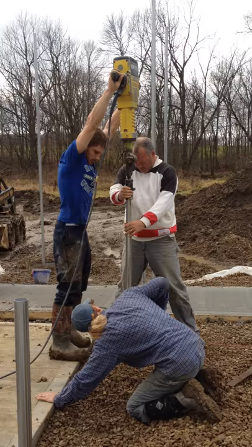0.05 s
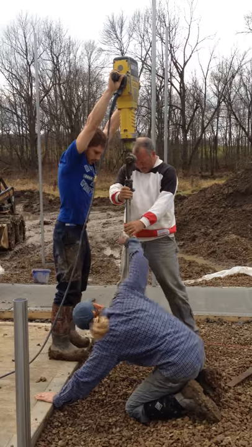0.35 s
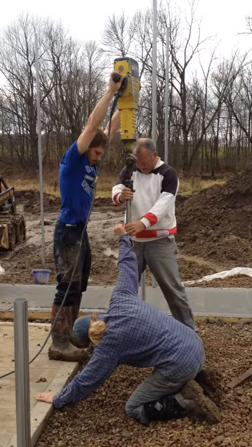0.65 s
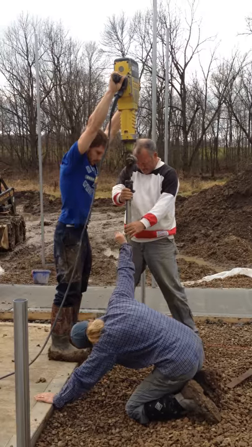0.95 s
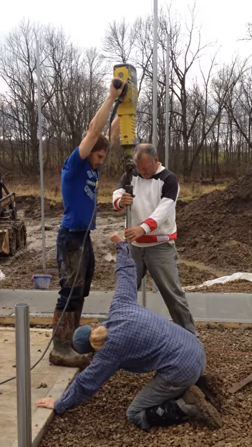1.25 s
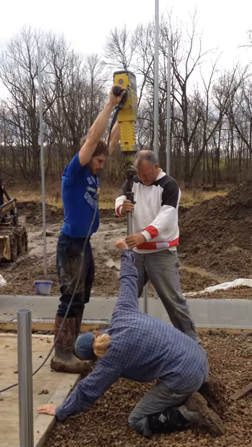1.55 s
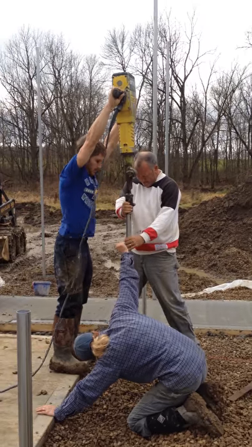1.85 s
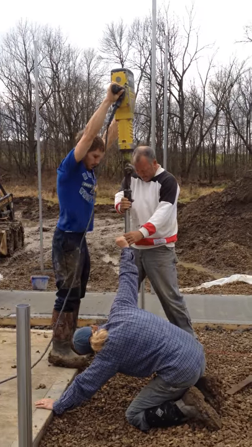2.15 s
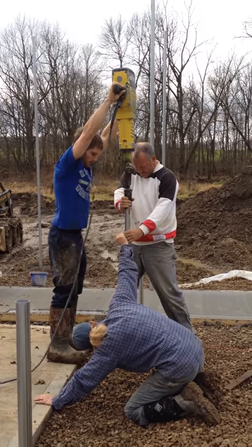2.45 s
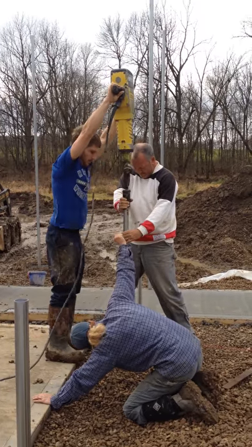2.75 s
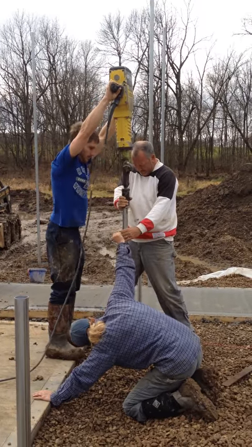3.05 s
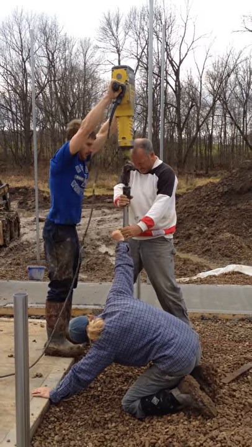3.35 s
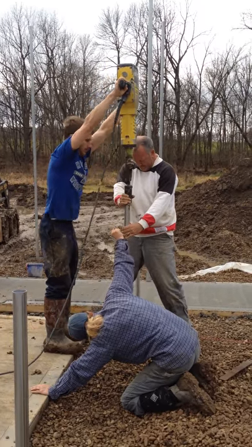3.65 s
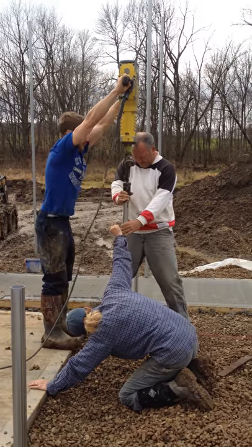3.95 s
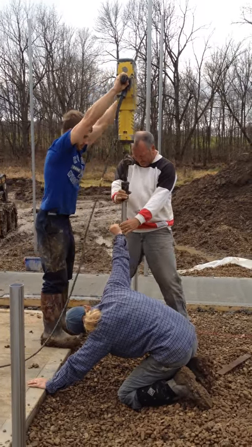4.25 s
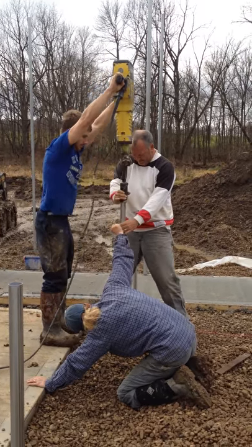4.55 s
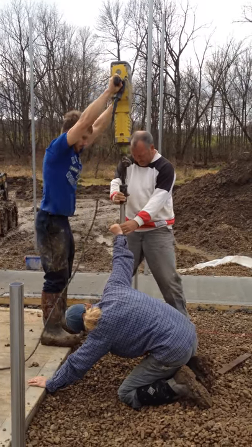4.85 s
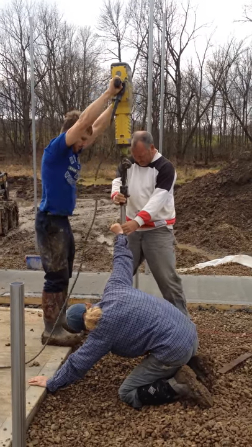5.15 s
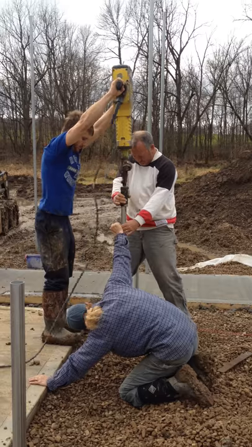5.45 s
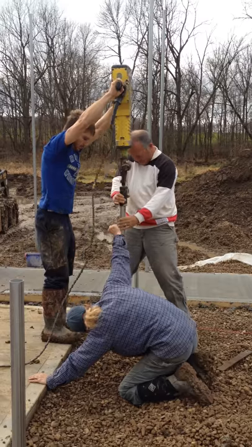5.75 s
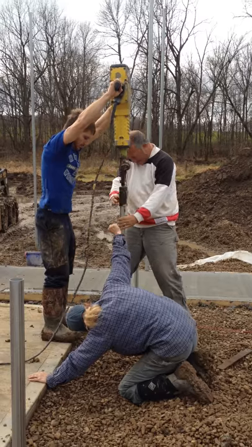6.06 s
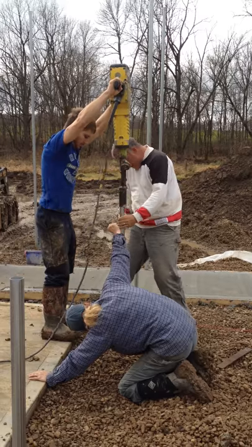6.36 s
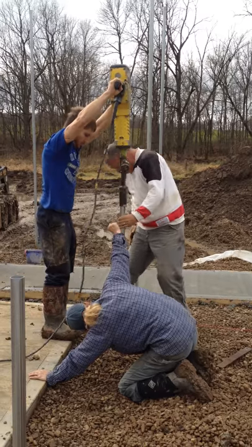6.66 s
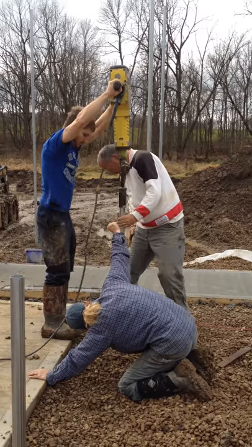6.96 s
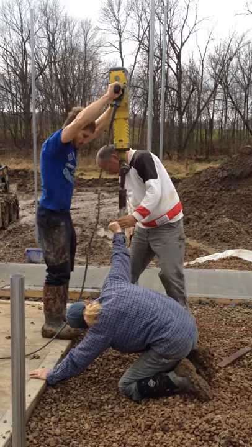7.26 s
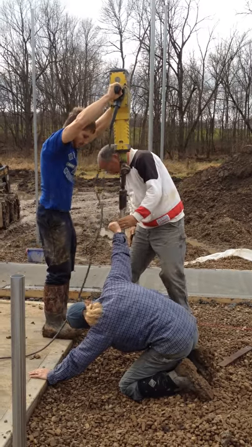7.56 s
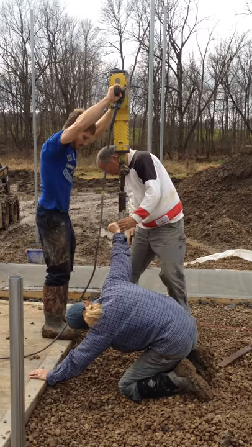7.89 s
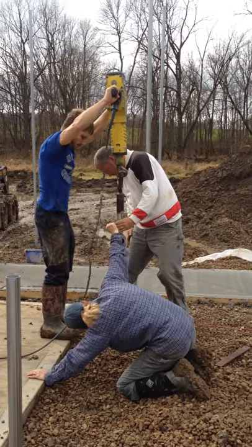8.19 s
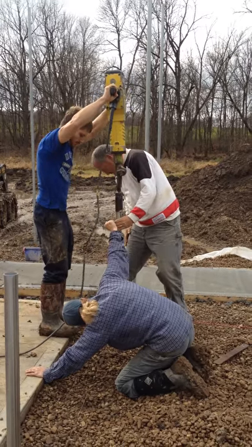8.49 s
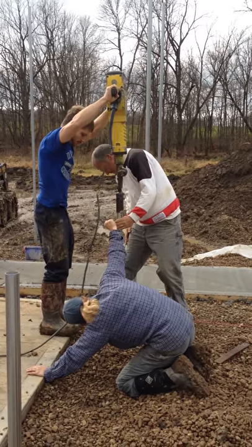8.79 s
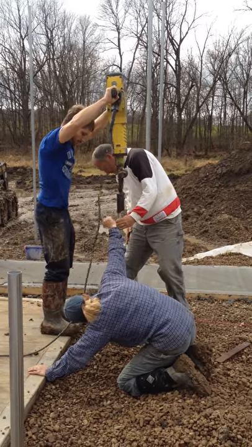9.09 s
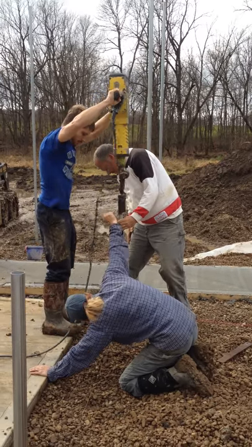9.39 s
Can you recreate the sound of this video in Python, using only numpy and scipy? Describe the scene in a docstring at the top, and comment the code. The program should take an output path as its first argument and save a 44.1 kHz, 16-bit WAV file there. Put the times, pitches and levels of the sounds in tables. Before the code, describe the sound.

Wind thuds on the microphone as an electric jackhammer starts and drives a steel fence post in fast, bright metallic blows.

```python
"""Gusts of wind buffet the microphone; then an electric jackhammer whirs up a few metres away, outdoors.
It drives a steel fence post into gravel, one blow on each turn of its crank. Each impact excites
the modes of the steel: a hard clank, a bright crack and a thin ring of the driving cap.
As the post sinks, the soil damps its low modes."""
import sys
import numpy as np
from scipy import signal
from scipy.fft import rfft, irfft, next_fast_len
from scipy.io import wavfile
from scipy.ndimage import map_coordinates

SR = 44100
rng = np.random.default_rng(int(sys.argv[2]) if len(sys.argv) > 2 else 0)


def pcm_store(signal):
    """Save signal as 16-bit PCM."""
    levels = np.round(np.clip(np.atleast_2d(signal), -1, 1) * 32767)
    wavfile.write(sys.argv[1], SR, levels.astype(np.int16).T)


N = 424683

# Spectra of the open air's hiss, the wind's low thudding and its brighter turbulence.
# Each row: frequency in Hz, relative spectral density in dB.
AIR_SPECTRUM = [(1000, -12), (2500, -7), (5000, -5), (10000, -21)]
THUD_SPECTRUM = [(50, -34), (80, -18), (120, -3), (165, 2), (230, 1), (330, -9.5), (600, -70.5)]
TURBULENCE_SPECTRUM = [(120, -32.5), (250, 2), (370, -0.5), (600, -8.5), (1000, -16.5), (1600, -29),
                       (3000, -40.5), (12000, -78)]
# The breeze, with long gusts at the start and near the end. Each row: time in seconds, level in dB.
BREEZE_LEVEL = [(0, -23.5), (1.15, -24.7), (1.27, -37.5), (1.5, -37.5), (2.5, -41), (3.5, -36), (4.25, -38),
                (4.8, -40.5), (4.95, -31.5), (5.3, -33), (5.58, -44), (6.5, -41), (6.9, -38.5), (7.38, -41),
                (7.54, -20.5), (7.95, -18.5), (8.15, -25.5), (8.45, -34.5), (9.05, -41), (9.63, -37.5)]
# Short buffets over the breeze. Each row: start in seconds, length in seconds, level in dB.
SHORT_BUFFETS = [(1.686, 0.023, -28.5), (1.736, .054, -25.5), (1.819, .1, -25.5), (1.974, 0.039, -25),
                 (2.106, 0.023, -26.5), (2.171, .078, -27), (2.278, 0.061, -26.5), (2.397, 0.054, -28),
                 (2.646, .21, -22), (2.903, .19, -21), (3.11, 0.051, -22.5), (3.258, 0.074, -22.5),
                 (3.346, 0.14, -30.5), (3.703, 0.096, -25), (3.84, 0.069, -22.5), (3.993, .14, -22.5),
                 (4.573, 0.031, -25.5), (4.718, 0.035, -29), (4.867, 0.076, -28), (5.048, 0.048, -26),
                 (5.117, 0.06, -28), (5.233, 0.04, -27.5), (5.388, .11, -29), (5.914, 0.11, -30.5),
                 (6.186, 0.19, -32), (6.228, 0.051, -26), (6.625, 0.038, -32), (7.947, 0.072, -20),
                 (8.181, 0.068, -25.5), (8.304, 0.027, -29)]
# Weight of turbulence against thudding. Each row: time in seconds, gain in dB.
TURBULENCE_GAIN = [(1.1, -8), (1.7, -1), (3, 2), (4.2, -2.5), (9.6, -3)]

# Crank speed: a slow start, a race, then steady work. Each row: time in seconds, turns per second.
CRANK_SPEED = [(1.2, 8.527), (1.46, 10.199), (1.91, 9.527), (2.45, 14.914), (2.59, 14.261), (2.69, 16.425),
               (2.99, 18.63), (3.58, 18.614), (3.68, 17.518), (4.04, 16.276), (4.37, 16.72), (4.47, 15.026),
               (5.09, 13.845), (5.87, 14.262), (6.15, 14.006), (6.25, 15.869), (6.41, 13.971),
               (6.64, 15.292), (6.92, 15.102), (7.02, 14.382), (7.45, 15.616), (7.55, 14.607),
               (8.66, 14.422), (9.63, 14.43)]
# Loudness of the motor. Each row: time in seconds, relative level in dB.
MOTOR_LEVEL = [(.988, -41), (1.05, -36), (1.18, -31.5), (1.3, -38), (2.5, -39.5), (2.9, -34.5), (3.55, -34),
               (3.9, -36.5), (4.7, -39), (9.6, -38)]
# Noise of fan and brushes. Each row: frequency in Hz, relative spectral density in dB.
WHIR_SPECTRUM = [(200, -56), (800, -5.5), (1600, -1.5), (2600, 2), (4000, -3), (6300, -1), (9000, -9),
                 (11500, -13), (15000, -10.5)]
# Resonances of the tool's shell. Each row: frequency in Hz, bandwidth in Hz, gain in dB.
HOUSING_MODES = [(1225, 86, -0.5), (2550, 65, -0.5), (3190, 350, 0), (5770, 360, -5.5)]
# Tones of the meshing gears. Each row: cycles per crank turn, relative level in dB.
GEAR_TONES = [(124, -22), (180, 5), (266, 9.5), (400, 7.5)]

# How firmly the tool bears on the post. Each row: time in seconds, relative level of a blow in dB.
BLOW_LEVEL = [(1.2, -5), (1.8, -5.5), (2.4, -6), (2.7, -7), (3.1, -6.5), (3.22, -7.5), (3.62, -4),
              (3.78, -6.5), (4.1, -9.5), (4.5, -6), (4.62, -6), (5.25, -7), (6.3, -6.5), (8.5, -6.5),
              (9.35, -7.5), (9.55, -5)]
# The cap rings more when it sits loose. Each row: time in seconds, level against the blow in dB.
CAP_RING_LEVEL = [(1.2, -24), (1.42, -11), (1.75, -31), (2.7, -19), (3.35, -30), (5.5, -19.5), (7, -14),
                  (7.8, -21), (8.6, -14.5), (9.63, -18)]
# Crowded steel modes, middle and high. Each row: frequency in Hz, relative spectral density in dB.
CLANK_SPECTRUM = [(150, -16), (500, -12), (850, -6), (1020, -6.5), (1230, -2.5), (1500, -10), (2100, -4),
                  (2450, -4.5), (2800, -0.5), (3700, 0.5), (4600, 1.5), (5600, -4.5), (8000, -35)]
CRACK_SPECTRUM = [(3000, -38), (4800, -22), (5600, -3), (6200, 2.5), (7000, -2.5), (7900, 1.5), (8800, -2),
                  (9800, 0.5), (11000, -6), (12300, -5), (14400, -2), (15200, -3)]
# Narrow resonances that ring after each blow, and those of the driving cap. Each row: frequency in Hz, relative
# level # in dB at first, the same once the post sits deep, time to decay by 60 dB in seconds.
BLOW_MODES = [(2350, -2, -14, .24), (2800, 4, 1, .06), (3370, 1, -9, .21), (4833, 0, -2, .12),
              (6150, 8, 10, .055), (7558, -11, -4, .28), (9500, -2, -6, .13)]
CAP_MODES = [(12662, -22, -6, .13), (13725, -14, -3, .07), (14258, 0, 0, .12)]

BUFFET_RISE_S, BUFFET_FALL_S, BUFFET_LIFT_DB = .012, .017, .5
EDDY_DB, SWIRL_DB = 1.62, 1.0  # quick and slow unsteadiness of the wind
THUD_LIMIT_DB = -20.5  # the thudding begins to saturate near this wind level
SWITCH_ON_S, FIRST_BLOW_S = .986, 1.2057
FORCE_SCATTER_DB, RING_SCATTER_DB, TIMING_SCATTER_S = 0.97, 3, .0003  # from blow to blow
SINK_START_S, SINK_LENGTH_S = 2.37, 5.6
PEAK_LIMIT, BAND_LIMIT_HZ = .72, 15250


def amp(db):
    """Amplitude ratio for a level in decibels."""
    return 10 ** (np.asarray(db) / 20)


def unit(x):
    """Normalisation to an rms of 1."""
    return x / np.sqrt(np.mean(x ** 2) + 1e-20)


def curve(points):
    """Linear interpolation of (seconds, value) points at every sample."""
    return np.interp(np.arange(N) / SR, *np.transpose(points))


def wobble(rate):
    """Smooth random modulation: a spline through rate knots a second."""
    knots = rng.standard_normal(int(N * rate / SR) + 4)
    return map_coordinates(knots, [np.arange(N) * rate / SR])


def filtered(x, response):
    """Linear filtering: the spectrum along the last axis is multiplied by a frequency response."""
    n = x.shape[-1]
    padded = next_fast_len(n + 2048)
    return irfft(rfft(x, padded) * response(np.fft.rfftfreq(padded, 1 / SR)), padded)[..., :n]


def coloured(x, spectrum):
    """Spectral shaping by (Hz, dB) points on a logarithmic frequency axis, at an rms of 1."""
    points_hz, db = np.transpose(spectrum)
    return unit(filtered(x, lambda hz: amp(np.interp(np.log(hz + 1), np.log(points_hz + 1), db))))


def open_air():
    """Stationary broadband noise is heard as a faint hiss."""
    return amp(-68) * coloured(rng.standard_normal(N), AIR_SPECTRUM)


def wind_level():
    """Powers add: the breeze plus buffets that rise, hold and fall away, in dB."""
    t = np.arange(N) / SR
    buffets = np.zeros(N)
    for start, length, db in SHORT_BUFFETS:
        outside = np.maximum((start - t) / BUFFET_RISE_S, (t - start - length) / BUFFET_FALL_S)
        envelope = np.exp(-np.clip(outside + .5, 0, 20))
        buffets = np.maximum(buffets, amp(db + BUFFET_LIFT_DB) * envelope)
    return 20 * np.log10(np.hypot(amp(curve(BREEZE_LEVEL)), buffets))


def wind():
    """Eddy pressure thuds on the microphone; strong gusts tear into brighter turbulence."""
    wind_db = wind_level()
    eddies = amp(EDDY_DB * wobble(45) + SWIRL_DB * wobble(14))
    tearing = amp(curve(TURBULENCE_GAIN) + 0.39 * (wind_db + 23) + 3.0 * wobble(260))
    saturation = np.hypot(1, .5 * amp(wind_db - THUD_LIMIT_DB))
    thud = coloured(rng.standard_normal(N), THUD_SPECTRUM) / saturation
    turbulence = tearing * coloured(rng.standard_normal(N), TURBULENCE_SPECTRUM)
    return amp(wind_db - 3.5) * eddies * (thud + turbulence)


def crank():
    """Rotation is the integral of speed: the crank starts from rest; turns count from the first blow."""
    t = np.arange(N) / SR
    spin_up = np.clip((t - SWITCH_ON_S) / (FIRST_BLOW_S - SWITCH_ON_S), 0, 1)
    turns = np.cumsum(curve(CRANK_SPEED) * spin_up) / SR
    return turns - np.interp(FIRST_BLOW_S, t, turns)


def housing(hz):
    """The shell responds as a sum of damped resonators of alternating sign."""
    return sum((-1) ** k * amp(db) * 1j * hz * width / (centre ** 2 - hz ** 2 + 1j * hz * width)
               for k, (centre, width, db) in enumerate(HOUSING_MODES))


def gears(turns, load):
    """Periodic load modulates the gear tones in pitch and level; at low speed the lowest one groans."""
    speed = np.maximum(np.gradient(turns) * SR, 10)  # turns per second
    squeeze = np.exp(4 * (load - 1)) * np.clip(turns + .5, 0, 1)  # builds up as the hammering begins
    # the shaft slows under load, so the whine swoops once a turn; at speed, inertia evens it out
    swoop = .008 * np.minimum(14 / speed, 1) ** 3 * load
    shaft = turns + swoop + .0006 * wobble(280) + .0035 * wobble(35)
    teeth = sum(amp(db + 2.1 * wobble(22)) * np.sin(2 * np.pi * order * shaft)
                for order, db in GEAR_TONES)
    whine = amp(-3.5) * squeeze ** .55 * unit(filtered(teeth, lambda hz: .5 + np.abs(housing(hz))))
    slowness = np.clip((13.5 - speed) / 3, 0, 1)
    groan_gain = amp(2 + 3 * wobble(400)) * slowness * squeeze
    groan = groan_gain * np.sin(2 * np.pi * GEAR_TONES[0][0] * shaft + .6 * wobble(400))
    return whine + groan


def motor(turns):
    """Forced vibration: fan, brushes, shell and gears sound together and swell ahead of each blow."""
    running_s = np.arange(N) / SR - SWITCH_ON_S
    load = np.cos(2 * np.pi * (turns - .79))  # greatest as the piston compresses its air cushion
    whir = amp(-3.5 + 3.8 * wobble(300)) * coloured(rng.standard_normal(N), WHIR_SPECTRUM)
    jolt = np.exp(-np.abs(running_s) / 0.022)  # the gears take up their slack at switch-on
    shell = (amp(-9.5) + jolt) * unit(filtered(rng.standard_normal(N), housing))
    gain = (running_s > 0) * amp(curve(MOTOR_LEVEL) + 1.6 * load)
    return gain * (whir + shell + gears(turns, load))


def clatter(t, count, spectrum, t60, tail_db, tail_t60, memory, uneven_db):
    """Crowded steel modes merge into noise that dies fast over the yard's faint reverberation."""
    fresh = rng.standard_normal((count, len(t)))
    # the seating shifts a little, so each blow only partly resembles the last
    steel = signal.lfilter([np.sqrt(1 - memory ** 2)], [1, -memory], fresh, axis=0)
    # each contact favours other groups of modes
    groups_hz = np.arange(0, SR / 2, 450)
    favour_db = uneven_db * rng.standard_normal((count, len(groups_hz)))
    steel = filtered(steel, lambda hz: amp([np.interp(hz, groups_hz, row) for row in favour_db]))
    attack = 1 - np.exp(-t / 0.0004)
    decay = np.hypot(amp(-60 * t / t60), amp(tail_db - 60 * t / tail_t60))
    return coloured(steel, spectrum) * attack * decay


def ringing(t, modes, depth, scatter_db, spread_hz):
    """Free vibration: close pairs of modes beat and decay; their balance shifts as the post sinks."""
    total = 0
    for hz, first_db, deep_db, t60 in modes:
        size, detune, phase = rng.standard_normal((3, 2, len(depth), 1))
        # the loose contact shakes the pitch until it settles
        shake = rng.standard_normal((len(depth), len(t))) * np.exp(-t / 0.05)
        cycles = (hz + spread_hz * detune) * t + phase + 0.003 * np.cumsum(shake, axis=1)
        pair = amp(scatter_db * size) * np.sin(2 * np.pi * cycles)
        level_db = first_db + (deep_db - first_db) * depth
        total = total + pair.sum(axis=0) * amp(level_db - 60 * t / t60)
    return total


def blow_times(turns):
    """A nearly periodic pulse train: the striker lands at each whole turn, a little early or late."""
    due_s = np.interp(np.arange(int(turns[-1]) + 1), turns, np.arange(N) / SR)
    return due_s + TIMING_SCATTER_S * rng.standard_normal(len(due_s))


def at_blows(starts_s, sounds):
    """Superposition: one row of sound is added at each blow time."""
    index = np.round(starts_s * SR).astype(int) + np.arange(sounds.shape[1])
    return np.bincount(index.ravel(), sounds.ravel(), N)[:N]


def hammer(turns):
    """Impact excitation: the striker hits the cap, the cap hits the post, and both ring."""
    starts_s = blow_times(turns)[:, None]
    force, seating = rng.standard_normal((2, len(starts_s), 1))
    blow_db = np.interp(starts_s, *np.transpose(BLOW_LEVEL)) + FORCE_SCATTER_DB * force
    ring_db = np.interp(starts_s, *np.transpose(CAP_RING_LEVEL)) + RING_SCATTER_DB * seating
    t = np.arange(SR // 6) / SR
    # with depth, soil damps the post's low modes and the cap's modes come free
    depth = np.clip((starts_s - SINK_START_S) / SINK_LENGTH_S, 0, 1)
    crack = amp(-5.0) * clatter(t, len(starts_s), CRACK_SPECTRUM, t60=0.051,
                                tail_db=-13, tail_t60=0.17, memory=0.54, uneven_db=2.0)
    clank = amp(-9.5 - 2 * depth) * clatter(t, len(starts_s), CLANK_SPECTRUM, t60=0.059,
                                            tail_db=-19.5, tail_t60=0.23, memory=0.59, uneven_db=3.0)
    post = amp(-29) * ringing(t, BLOW_MODES, depth, scatter_db=3.5, spread_hz=18)
    cap = amp(ring_db) * ringing(t, CAP_MODES, depth, scatter_db=3.5, spread_hz=24)
    return at_blows(starts_s, amp(blow_db) * (crack + clank + post + cap))


def scene():
    """Sound pressures add at a single microphone, which feeds both channels."""
    turns = crank()
    mono = open_air() + hammer(turns) + motor(turns) + wind()
    return np.array([mono, mono])


def record(dry):
    """Soft saturation rounds off the highest peaks, and a steep low-pass filter limits the band."""
    rounded = dry / (1 + np.abs(dry / PEAK_LIMIT) ** 6) ** (1 / 6)
    return filtered(rounded, lambda hz: 1 / np.sqrt(1 + (hz / BAND_LIMIT_HZ) ** 300))


dry = scene()
out = record(dry)
pcm_store(out)
```